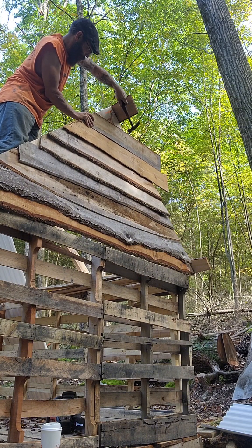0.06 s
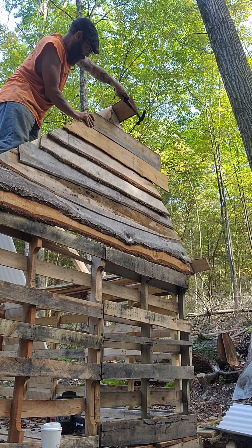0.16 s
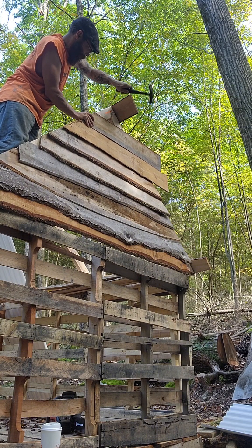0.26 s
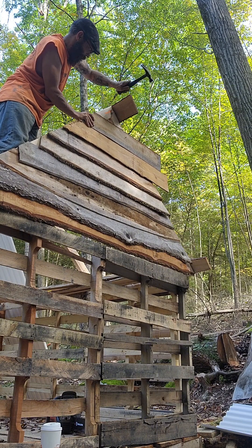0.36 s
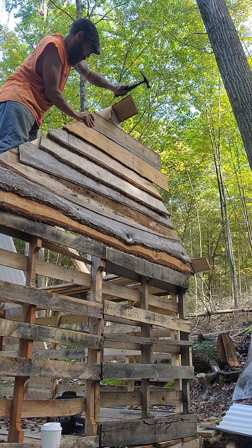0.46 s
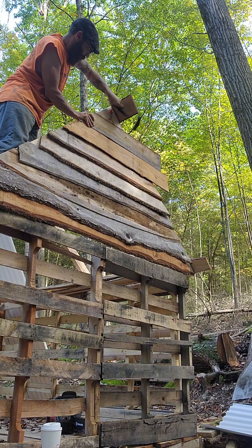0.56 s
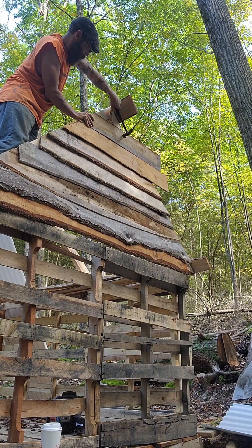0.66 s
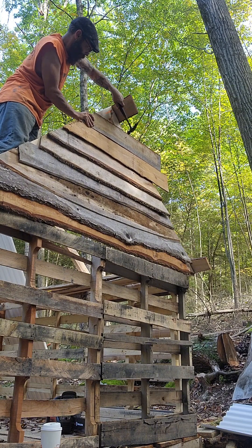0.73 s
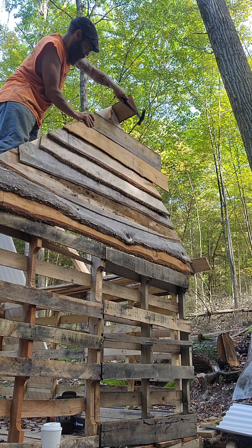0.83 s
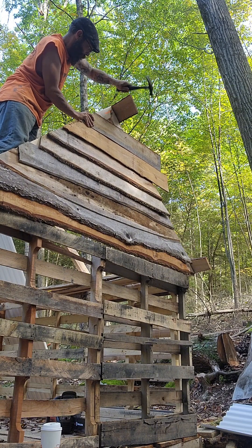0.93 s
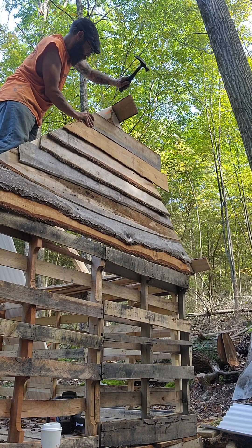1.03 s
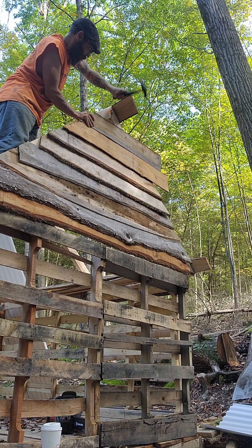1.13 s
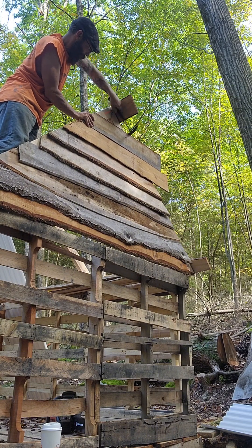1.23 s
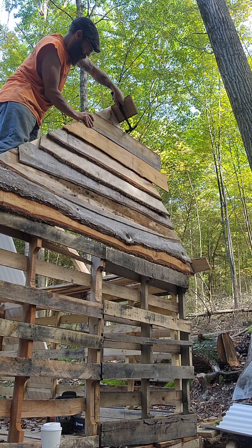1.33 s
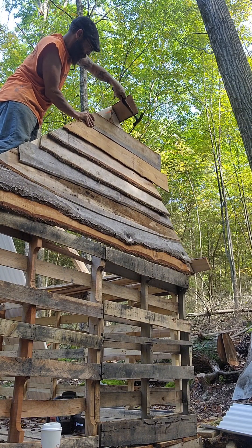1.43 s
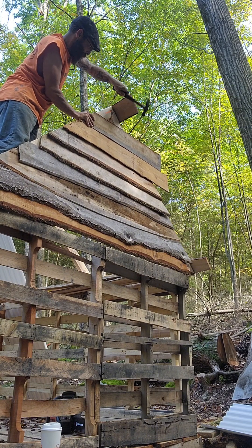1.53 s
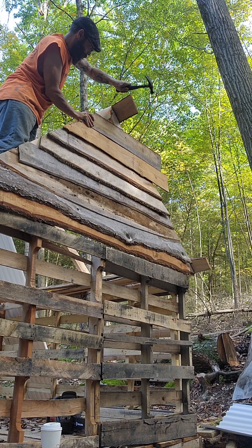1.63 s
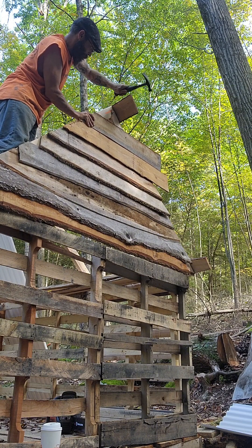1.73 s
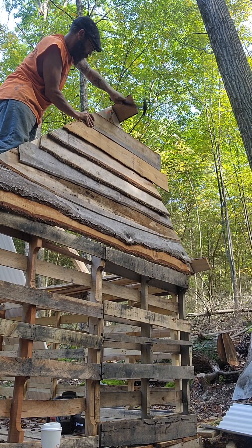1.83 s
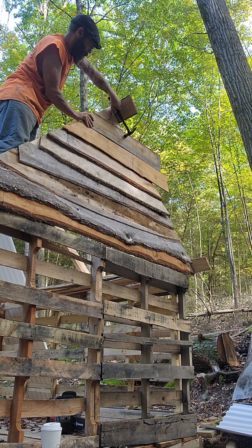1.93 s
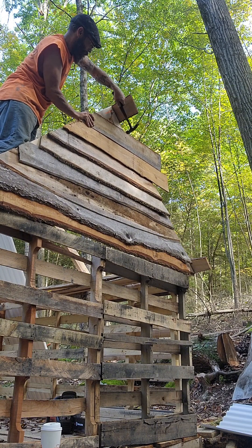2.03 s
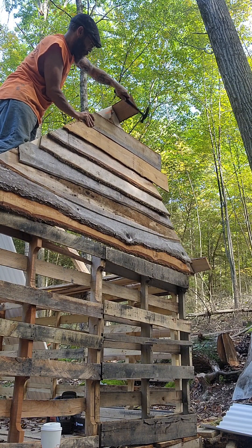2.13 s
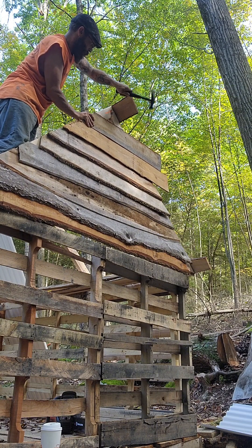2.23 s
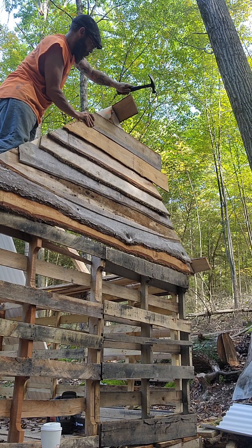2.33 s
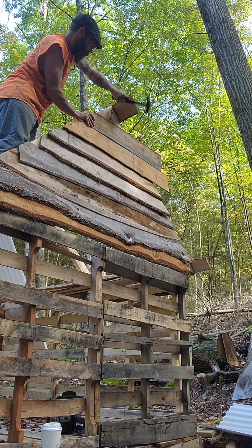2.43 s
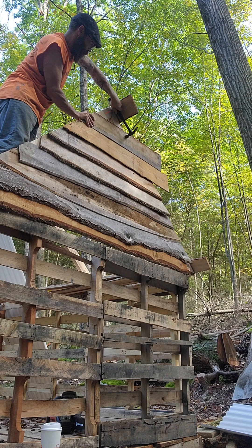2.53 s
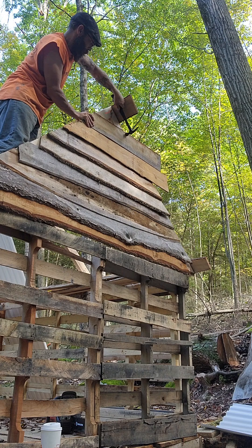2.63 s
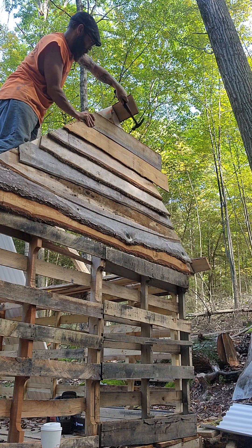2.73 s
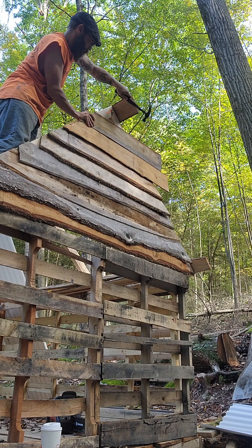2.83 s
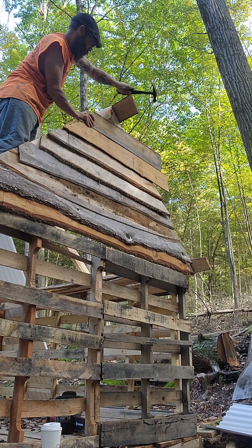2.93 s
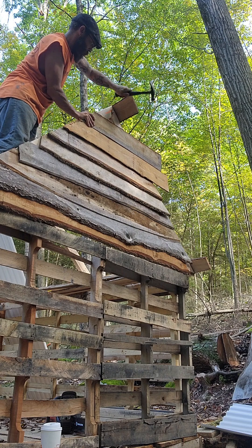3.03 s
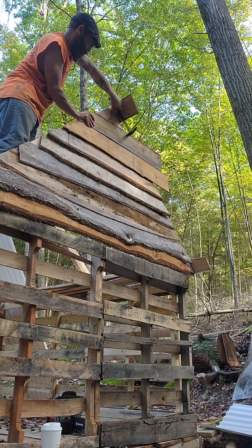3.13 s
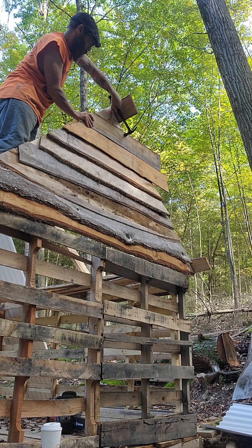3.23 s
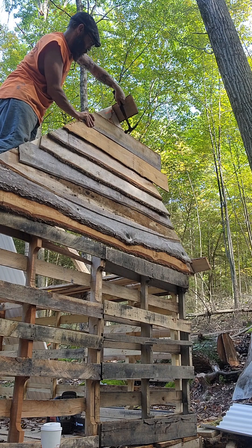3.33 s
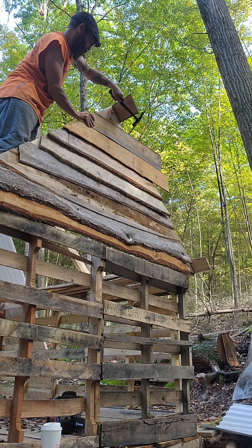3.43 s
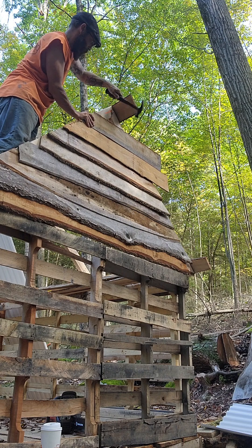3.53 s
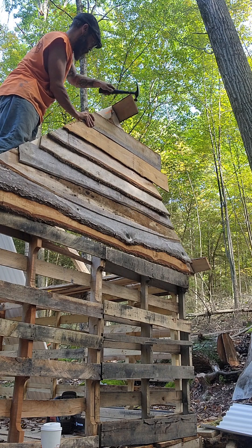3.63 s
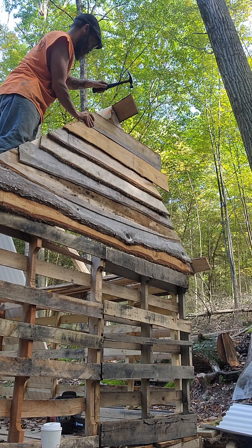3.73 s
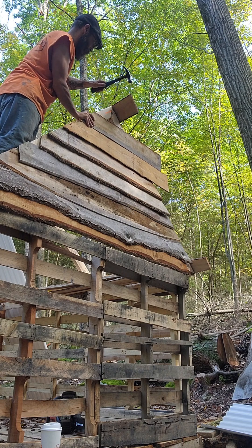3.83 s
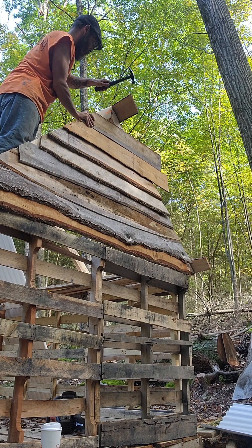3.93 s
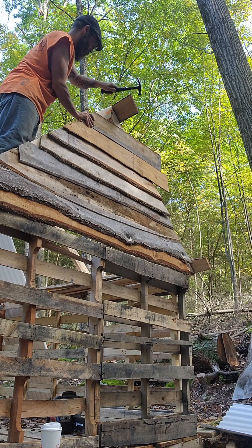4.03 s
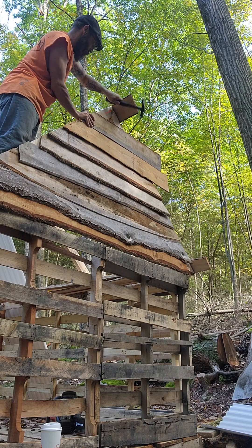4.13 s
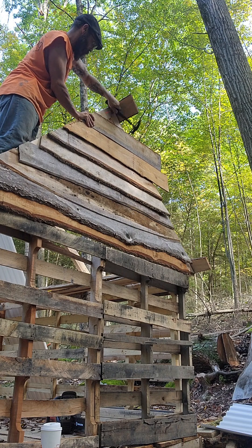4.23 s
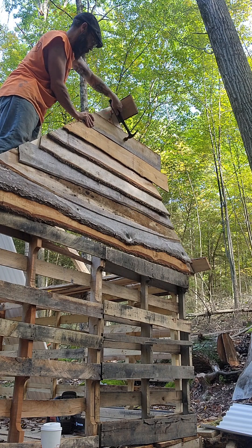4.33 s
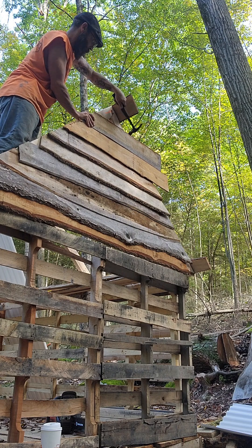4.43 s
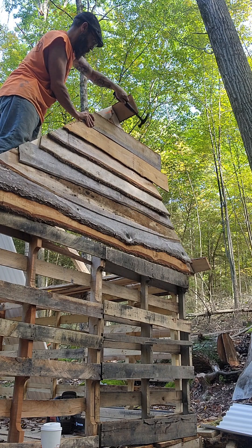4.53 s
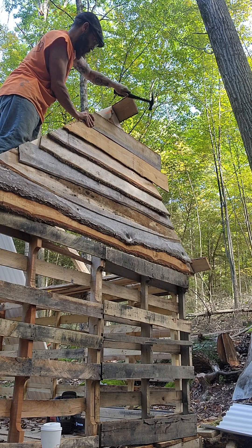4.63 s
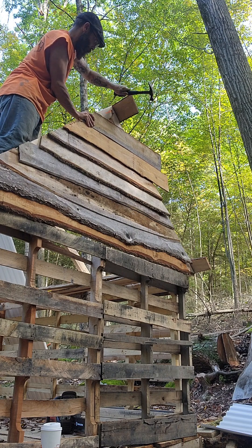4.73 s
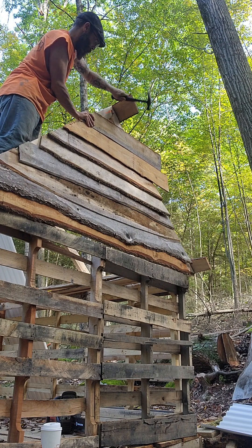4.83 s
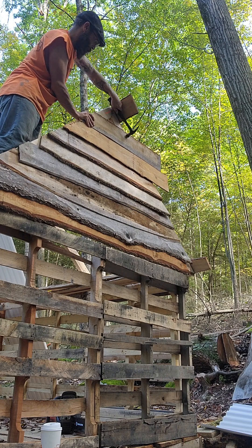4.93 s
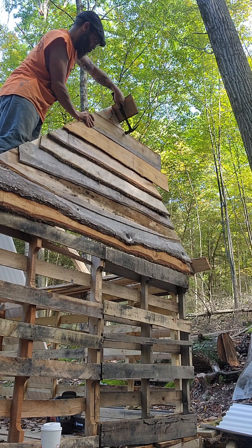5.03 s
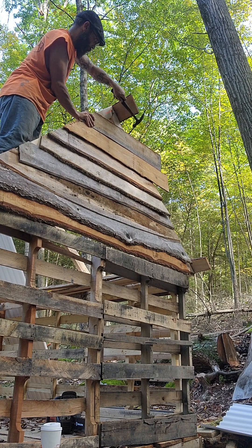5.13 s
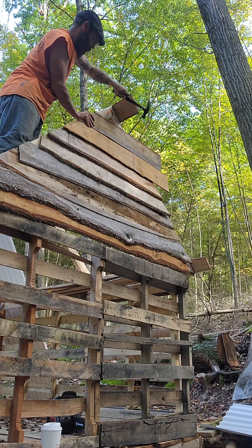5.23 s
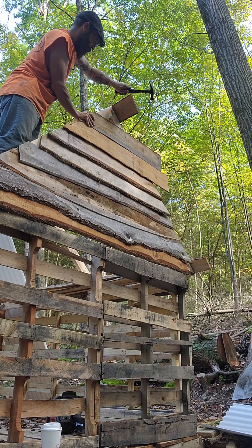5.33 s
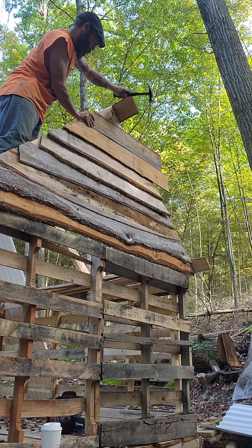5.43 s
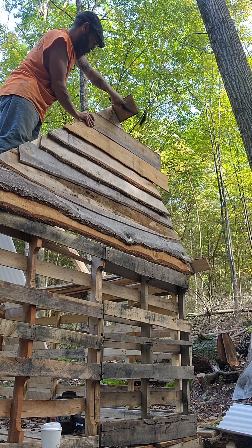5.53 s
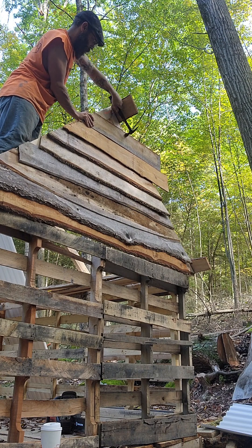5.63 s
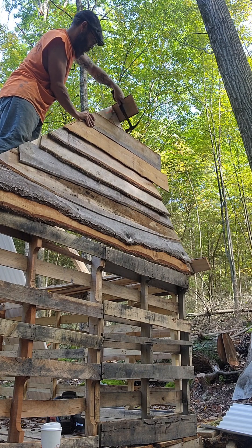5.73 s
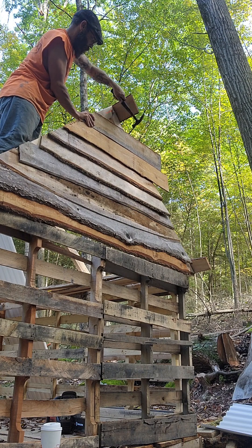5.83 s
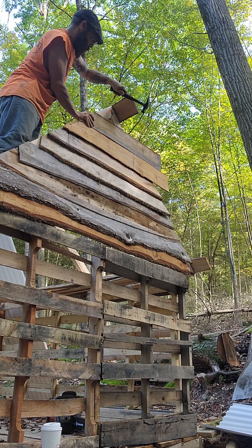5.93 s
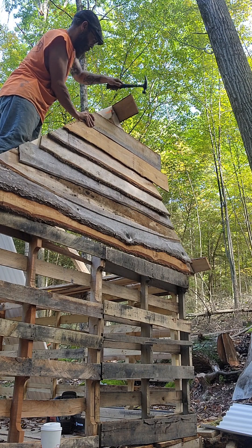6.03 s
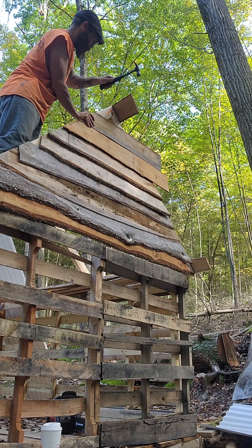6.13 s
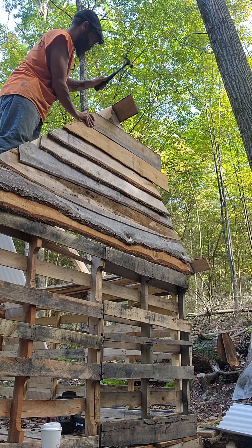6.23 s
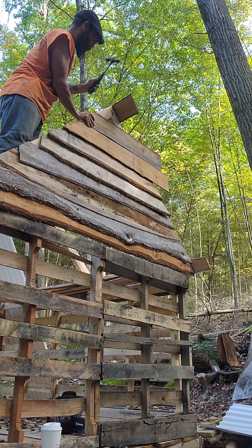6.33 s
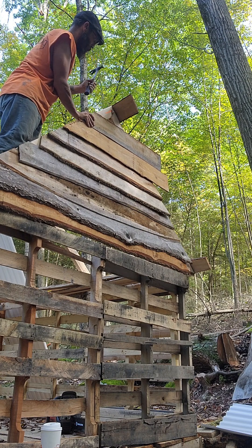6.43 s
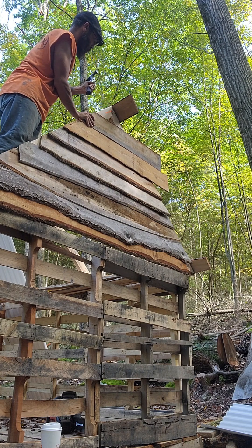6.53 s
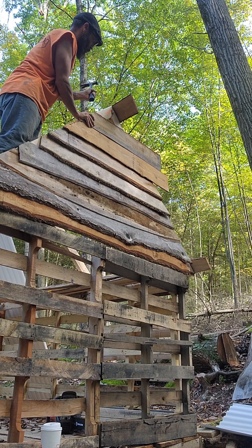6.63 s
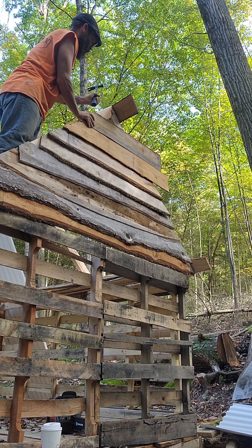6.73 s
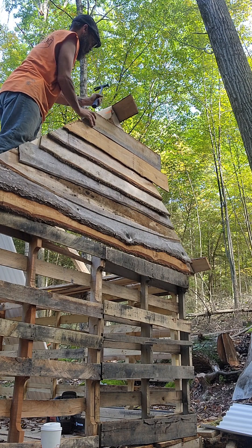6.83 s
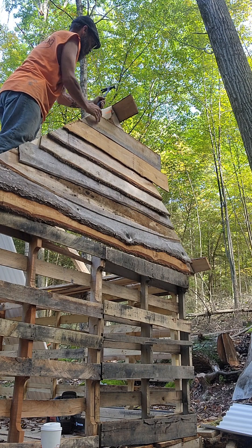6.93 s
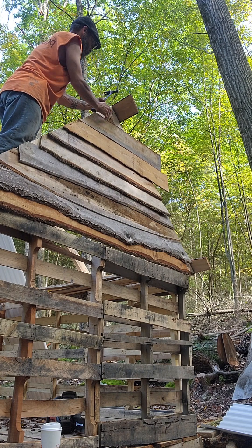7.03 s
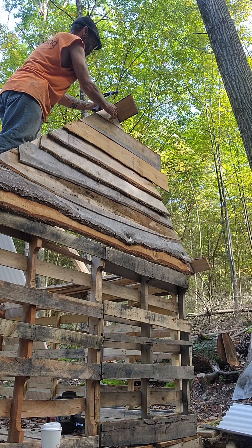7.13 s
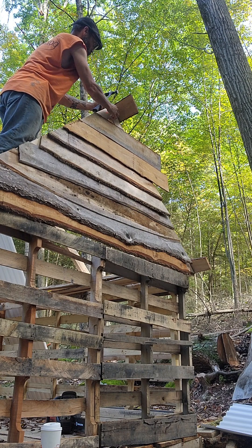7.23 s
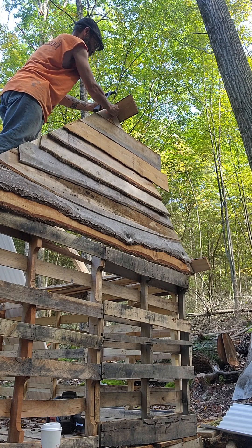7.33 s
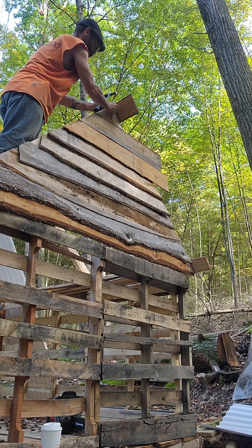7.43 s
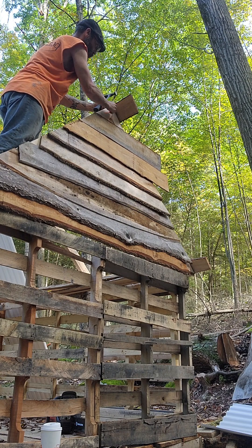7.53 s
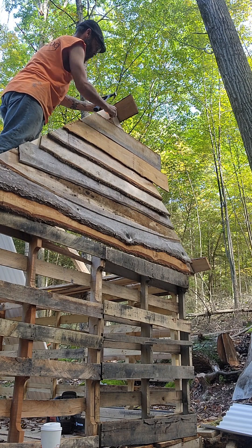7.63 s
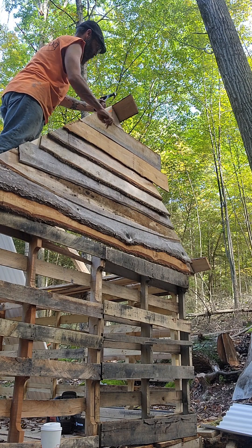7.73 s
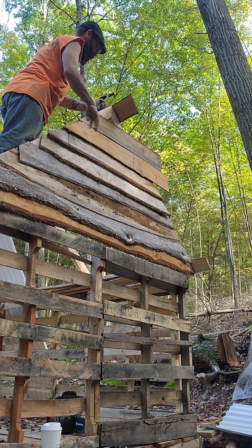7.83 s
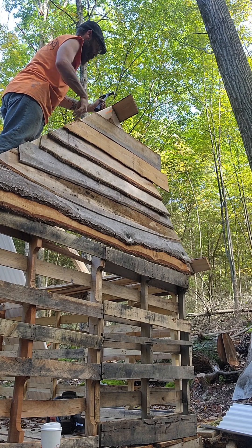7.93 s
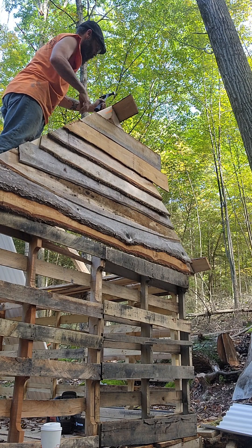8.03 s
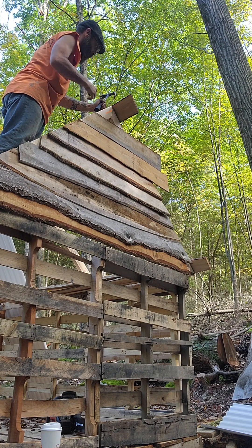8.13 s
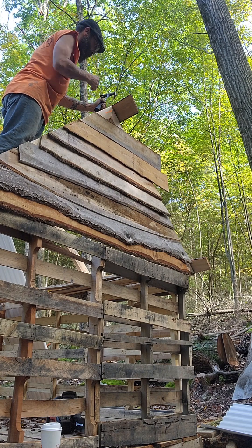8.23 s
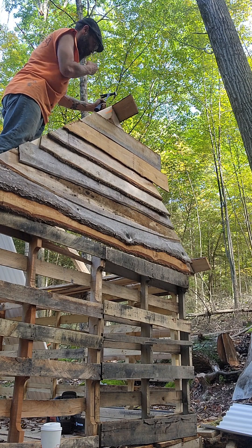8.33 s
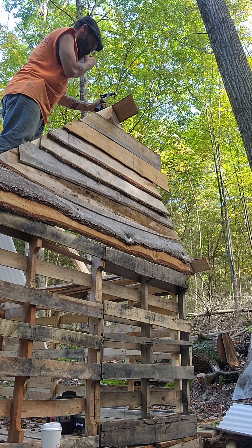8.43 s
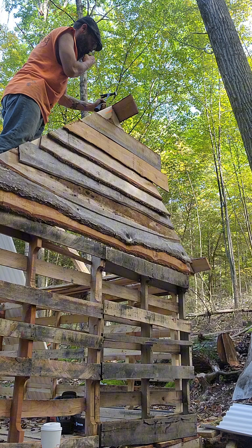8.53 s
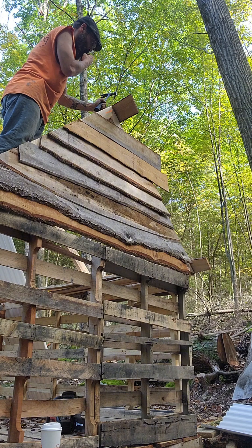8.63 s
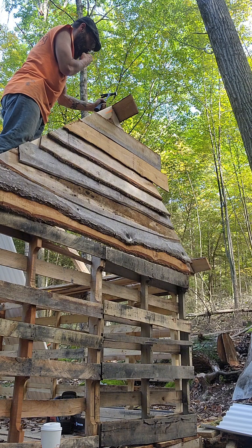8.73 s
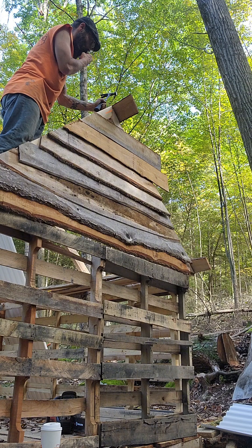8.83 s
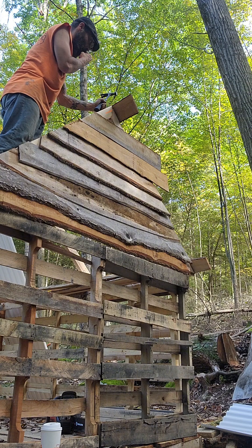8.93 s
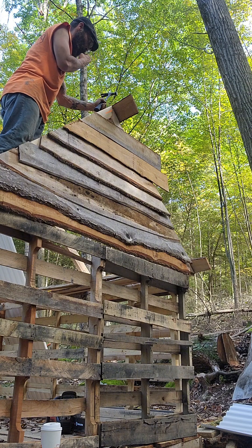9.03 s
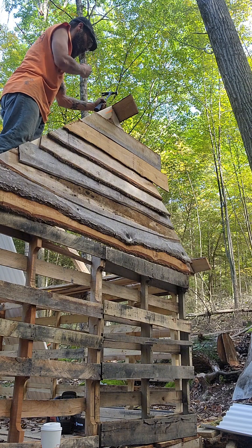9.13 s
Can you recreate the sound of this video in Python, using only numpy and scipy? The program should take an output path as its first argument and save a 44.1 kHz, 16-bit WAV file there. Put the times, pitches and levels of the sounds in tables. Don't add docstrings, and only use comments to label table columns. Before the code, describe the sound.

Outdoors in leafy woods, sharp hammer strikes ring on a nail and thump loose boards, with a pause, then small dry ticks and scrapes.

```python
import sys
import numpy as np
from scipy import signal
from scipy.fft import rfft, irfft, next_fast_len
from scipy.io import wavfile
from scipy.ndimage import uniform_filter1d, map_coordinates

SR = 44100
rng = np.random.default_rng(int(sys.argv[2]) if len(sys.argv) > 2 else 0)


def unload_audio(sound):
    columns = np.transpose(np.atleast_2d(sound))
    steps = np.round(np.clip(columns, -1, 1) * 32767)
    wavfile.write(sys.argv[1], SR, steps.astype(np.int16))


def decibels_to_gain(level_db):
    exponent = np.asarray(level_db, float) / 20
    return 10 ** exponent


N = 404382


def unit(x):
    return x / np.sqrt(np.mean(x ** 2) + 1e-20)


def along(points, hz):
    f, v = np.transpose(points)
    return np.interp(np.log(hz + 1), np.log(f + 1), v)


def wobble(rate_hz):
    return map_coordinates(rng.standard_normal(int(N * rate_hz / SR) + 4), [np.arange(N) * rate_hz / SR])


def filtered(x, response):
    m = next_fast_len(x.shape[-1] + 4096)
    return irfft(rfft(x, m) * response(np.fft.rfftfreq(m, 1 / SR)), m)[..., :x.shape[-1]]


def noise(size, spectrum, alike):
    def mid_side(hz):
        turn = np.arccos(np.clip(along(alike, hz), -1, 1)) / 2
        return decibels_to_gain(along(spectrum, hz)) * [np.cos(turn), np.sin(turn)]
    mid, side = filtered(rng.standard_normal((2, size)), mid_side)
    return unit(np.array([mid + side, mid - side]))


def shaped(x, gain_db):
    hz, t, z = signal.stft(x, SR, nperseg=256)
    return signal.istft(z * decibels_to_gain(gain_db(hz[:, None], t)), SR, nperseg=256)[1][..., :x.shape[-1]]


def patchy(x, patchy_db):
    field = rng.standard_normal((129, x.shape[-1] // 128 + 4))
    field = uniform_filter1d(field, size=3, axis=0)
    field = unit(uniform_filter1d(field, size=16, axis=1))
    return shaped(x, lambda hz, t: patchy_db * field[:, :len(t)])


def ring(modes, t, attack, spread, longest):
    draw = rng.standard_normal((len(modes), 2)) * [.35, 1]
    side = np.array([[1], [-1]])
    total = 0
    for (hz, db, t60), (start, turn) in zip(modes, draw):
        t60 = min(t60, longest * (500 / hz) ** 0.21)
        phase = start + spread * turn * side * hz / (hz + 500)
        total = total + decibels_to_gain(db - 60 * t / t60) * np.sin(2 * np.pi * hz * t + phase)
    return total * (1 - np.exp(-t / attack))


def ports(x, lean, lead_s):
    def response(hz):
        half = decibels_to_gain(along(lean, hz) / 2) * np.exp(1j * np.pi * hz * lead_s)
        return np.array([half, 1 / half])
    return filtered(x, response)


def add(track, s, x):
    i = round(s * SR)
    track[:, i:i + x.shape[-1]] += x[..., :N - i]


# frequency in Hz, likeness -1 to 1.
DIFFUSE_ALIKE = [(60, 0.99), (180, 0.93), (550, 0.76), (1650, 0.094), (4970, -0.09), (15000, -0.02)]
# frequency in Hz, level in dB per Hz.
RUMBLE_COLOUR = [(12, -35), (20, -6.5), (48, 0), (61, 0.5), (108, -19), (130, -15), (170, -42), (290, -120)]
# frequency in Hz, level in dB per Hz.
DRONE_COLOUR = [(60, -120), (110, -40.5), (148, -7.5), (165, 1), (184, -5.5), (240, -46), (400, -120)]
# centre in seconds, level in dB, half length in seconds.
DRONE_SWELLS = [
    (0, -53.5, 0.308),
    (.7, -64, 0.25),
    (1.3, -57, 0.304),
    (1.9, -54, 0.291),
    (2.8, -62.5, 0.363),
    (4.2, -62, 0.27),
    (5.3, -68.5, .5),
    (7.1, -76, 0.47),
    (9.1, -73.5, 0.37),
]


def traffic():
    t = np.arange(N) / SR
    rumble_db = -64.5 + 0.63 * wobble(0.73) + 1.0 * wobble(4.4)
    rumble = decibels_to_gain(rumble_db) * noise(N, RUMBLE_COLOUR, DIFFUSE_ALIKE)
    passing = decibels_to_gain(-81) + sum(decibels_to_gain(db) * np.exp(-((t - s) / half_s) ** 2) for s, db, half_s in DRONE_SWELLS)
    return rumble + passing * decibels_to_gain(1.1 * wobble(9.7)) * noise(N, DRONE_COLOUR, DIFFUSE_ALIKE)


# frequency in Hz, level in dB per Hz.
LEAF_COLOUR = [(59, -39.5), (100, -10), (152, -8), (234, -17.5), (280, -15), (577, -16.5), (716, -14.5),
               (1170, -19.5), (1320, -15), (1530, -22.5), (1930, -21), (2360, -26), (4690, -27.5),
               (7500, -51), (9750, -74.5), (16500, -120)]
# time in seconds, level in dB.
BREEZE_LEVEL = [
    (0, -63.5),
    (2, -64),
    (4.2, -65.5),
    (6.4, -65.5),
    (7, -68.5),
    (7.8, -65),
    (9.17, -63.5),
]


def leaves():
    s, db = np.transpose(BREEZE_LEVEL)
    leaves_db = np.interp(np.arange(N) / SR, s, db, -120, -120) + .6 * wobble(7)
    return decibels_to_gain(leaves_db) * patchy(noise(N, LEAF_COLOUR, DIFFUSE_ALIKE), patchy_db=1.95)


MIDDLE_STEEL_DB, MIDDLE_AIR_DB, MIDDLE_KNOCK_DB = -15, -38, -18
MIDDLE_TILT_DB = 1.91


def brightness(steel_db, air_db):
    return MIDDLE_TILT_DB + .1 * (steel_db - MIDDLE_STEEL_DB) + 0.1 * (air_db - MIDDLE_AIR_DB)


# frequency in Hz, likeness -1 to 1.
SHED_ALIKE = [(100, 0.98), (300, 1), (700, 0.71), (1500, 1), (4000, 0.67), (12000, 0.35)]
# frequency in Hz, level in dB per Hz.
CRACK_COLOUR = [(590, -29.5), (1000, 1), (1690, -6.5), (3040, -0.5), (3790, 1.5), (4270, 4.5), (6100, -14),
                (7600, -36), (9880, -52.5), (16700, -120)]


def steel_contact(t):
    return (1 - np.exp(-t / .0002)) * np.exp(-(t / .0026) ** 2)


def crack(t, db):
    return decibels_to_gain(db) * steel_contact(t) * noise(len(t), CRACK_COLOUR, SHED_ALIKE)


# pitch over crack pitch, level in dB.
HEAD_MODES = [
    (.34, -8),
    (.67, -4),
    (1, -1),
]


def head_clang(t, steel_db, crack_hz):
    harder_db = steel_db - MIDDLE_STEEL_DB
    clang = [(r * crack_hz, db + harder_db * (1 if r == 1 else 0.32), .019) for r, db in HEAD_MODES]
    return decibels_to_gain(MIDDLE_STEEL_DB + 8.5) * ring(clang, t, attack=0.00082, spread=0.037, longest=.2)


# frequency in Hz, level in dB, t60 in seconds.
NAIL_MODES = [
    (5090, 0, .17),
    (6870, -14, .06),
    (2700, -6, .07),
]


def nail_ring(t, nail_db):
    modes = sum(decibels_to_gain(db - 60 * t / t60) * np.sin(2 * np.pi * hz * t) for hz, db, t60 in NAIL_MODES)
    return decibels_to_gain(nail_db - 2.5 + np.array([[-3.5], [1.5]])) * modes


# frequency in Hz, level in dB per Hz.
AIR_COLOUR = [(5500, -28.5), (7200, -6.5), (8000, -16), (9000, 0), (10500, -1.5), (13300, -0.5),
              (14800, -4), (16300, -24)]


def air_burst(t, air_db):
    envelope = .7 * steel_contact(t) + decibels_to_gain(-12 - 60 * t / .12) + decibels_to_gain(-29 - 60 * t / .33)
    return decibels_to_gain(air_db + 4.0) * envelope * noise(len(t), AIR_COLOUR, SHED_ALIKE)


def wood_push(late, thump_db):
    hz = 270
    push_db = -5 + .55 * (thump_db + 10.5)
    return decibels_to_gain(push_db - 60 * late * hz / 5.9) * np.sin(2 * np.pi * hz * late) * (1 - np.exp(-late / .0006))


# frequency in Hz, level in dB, t60 in seconds.
BEAM_MODES = [
    (166.5, -8.5, 0.21),
    (220.2, -0.5, .22),
]


def beam_thump(late, thump_db, favoured_hz, knock_db):
    thump = decibels_to_gain(thump_db - 6.0) * ring(BEAM_MODES, late, attack=0.012, spread=.05, longest=.2)
    return thump + ring([(favoured_hz, knock_db + 0.5, .038)], late, attack=.0006, spread=.3, longest=.2)


# frequency in Hz, level in dB, t60 in seconds.
SLAB_MODES = [(262.5, -8, .2), (351.4, -4.5, .25), (434.54, -12, .2), (501.5, -5, .2), (605.2, -7, .25),
              (679.3, -8, .2), (761, -10, .15), (851.2, -11, .15), (960, -12.5, 0.15), (1204.8, -11.5, .18),
              (1336, -7, .18), (1413.4, -10.5, .16), (1635, -16.5, .15), (1860, -10, .14)]
# frequency in Hz, level in dB, t60 in seconds.
SLAT_MODES = [
    (2165, -19.5, .13),
    (2726, -21, 0.14),
    (3110, -19.5, 0.082),
    (3478, -20.5, .11),
    (4056, -19, 0.12),
    (4200, -17, 0.04),
    (5010, -21.5, 0.11),
]


def woken(favoured_hz, tilt):
    hz, db, t60 = np.transpose(SLAB_MODES + SLAT_MODES)
    chance = rng.standard_normal((2, len(hz)))
    favour_db = 3 * np.exp(-(np.log2(hz / favoured_hz) / 0.1) ** 2)
    tilt_db = (tilt - MIDDLE_TILT_DB) * np.log2(hz / 700)
    return np.transpose([hz * (1 + .01 * chance[0]), db + favour_db + tilt_db + 2.5 * chance[1], t60])


def boards(late, boards_db, favoured_hz, tilt, free):
    first = 1 + 0.39 * np.exp(-late / .006)
    modes = woken(favoured_hz, tilt)
    return decibels_to_gain(boards_db - 4) * first * ring(modes, late, attack=.0008, spread=.8, longest=.2 * free)


# frequency in Hz, level in dB per Hz.
CLATTER_COLOUR = [(88, -36), (150, 5.5), (558, -3), (929, -9), (1250, -5), (2450, -15.5), (2750, -12.5),
                  (4960, -21.5), (5940, -27.5), (7000, -27.5), (7600, -45.5), (9880, -71.5), (16700, -120)]
# frequency in Hz, t60 in seconds.
CLATTER_DECAY = [(200, 0.24), (700, 0.22), (1500, 0.17), (3000, 0.16), (7000, 0.11), (14000, 0.12)]


def clatter(late, boards_db, tilt, free):
    def dying(hz, u):
        return tilt * np.log2(hz / 700 + 0.14) - 60 * u / along(CLATTER_DECAY, hz) / free
    rattling = shaped(noise(len(late), CLATTER_COLOUR, SHED_ALIKE), dying)
    return decibels_to_gain(boards_db - 2.77) * (1 - np.exp(-late / 0.0007)) * rattling


# frequency in Hz, level in dB, t60 in seconds.
FRAME_MODES = [
    (55.6, -5, 0.38),
    (82, -2.5, 0.33),
    (89.85, -2, 0.43),
    (117.5, -1.5, 0.27),
]


def frame_sway(t, s):
    return decibels_to_gain(-21.5 - 1.5 * s - 4.5) * ring(FRAME_MODES, t, attack=0.044, spread=.05, longest=0.44)


# start in seconds, steel in dB, air in dB, nail ring in dB, crack pitch in Hz.
STEEL_BLOWS = [
    (0.0734, -11, -36, -31, 4114),
    (0.7421, -18.5, -35.5, -20.5, 4013),
    (1.3898, -12, -37.5, -21.5, 4020),
    (2.032, -11, -31.5, -32, 4100),
    (2.6769, -12.5, -35, -31, 4150),
    (3.3139, -16, -40, -33, 4200),
    (4.4151, -19.5, -51, -37, 4061),
    (5.0763, -11.5, -43, -45.5, 3820),
    (5.7177, -12.5, -36.5, -39, 3950),
]
# boards in dB, thump in dB, favoured pitch in Hz,
# first knock in dB, echo in dB.
WOOD_ANSWERS = [
    (-14, -8.5, 550, -20.5, -43.5),
    (-13.5, -9.5, 1600, -21, -44.5),
    (-13.5, -13, 690, -19.5, -42),
    (-13, -8.5, 650, -14, -44.5),
    (-15, -11.5, 365, -23.5, -43),
    (-12.5, -21, 600, -13.5, -37),
    (-13.5, -18, 560, -7.5, -44),
    (-11.5, -23.5, 520, -5, -40),
    (-15, -19, 510, -15, -42.5),
]
# start in seconds, level in dB.
HEAD_BOUNCES = [
    (.094, -24),
    (.794, -41),
    (2.039, -25),
    (3.335, -24.5),
]
# frequency in Hz, left over right in dB.
SHED_LEAN = [(60, 0), (200, -0.2), (700, -0.4), (1290, -0.53), (2380, 3.5), (4400, -2), (8120, 13.5),
             (15000, 8)]


def hammer():
    out, t = np.zeros((2, N)), np.arange(SR * 2 // 5) / SR
    late = np.maximum(t - .0026, 0)
    for steel, wood in zip(STEEL_BLOWS, WOOD_ANSWERS):
        s, steel_db, air_db, nail_db, crack_hz = steel
        boards_db, thump_db, favoured_hz, knock_db, _ = wood
        tilt = brightness(steel_db, air_db)
        free = 1 - .015 * (knock_db - MIDDLE_KNOCK_DB)
        knots = rng.standard_normal((2, 130))
        slow, fast = decibels_to_gain(2.9 * map_coordinates(knots, [[0 * t, 0 * t + 1], [t * 90, t * 300]]))
        blow = crack(t, steel_db + 3.4) + head_clang(t, steel_db, crack_hz) + air_burst(t, air_db)
        blow += wood_push(late, thump_db)
        blow += slow * (nail_ring(t, nail_db) + beam_thump(late, thump_db, favoured_hz, knock_db))
        blow += slow * boards(late, boards_db, favoured_hz, tilt, free)
        blow += fast * clatter(late, boards_db, tilt, free) + frame_sway(t, s)
        add(out, s, blow)
    for s, db in HEAD_BOUNCES:
        add(out, s, crack(t, db + 5.0))
    low_cut = signal.butter(3, 56, "high", fs=SR, output="sos")
    return ports(signal.sosfilt(low_cut, out), SHED_LEAN, lead_s=0.00015)


# frequency in Hz, level in dB per Hz.
ECHO_COLOUR = [(88, -28.5), (150, -7), (398, -8), (484, -8.5), (566, -8), (1140, -13), (1260, -11),
               (1940, -11.5), (2450, -14.5), (5150, -15), (6910, -28), (7920, -58.5), (13200, -45),
               (16000, -70)]
# frequency in Hz, t60 in seconds.
ECHO_DECAY = [(200, 2.8), (1000, 2.1), (3000, 1.486), (5000, 1.2), (7000, 1.1), (12000, 0.37)]
# centre in Hz, width in Hz, level in dB.
HOLLOW_BANDS = [
    (1300, 14, -15.5),
    (1930, 6.1, -17),
    (2080, 9, -19.5),
]


def shed_lift(hz):
    peaks = [1 / (1 + ((hz - f) / (10 + .007 * f)) ** 2) for f, *_ in SLAB_MODES + SLAT_MODES]
    return 1 + 0.29 * sum(peaks)


def hollow(hz):
    return sum(decibels_to_gain(db) / np.sqrt(w / 15) / (1 + ((hz - f) / w) ** 2) for f, w, db in HOLLOW_BANDS)


def forest():
    out, t = np.zeros((2, N)), np.arange(SR * 7 // 5) / SR
    swell = 1 - 0.77 * np.exp(-(t / 0.2) ** 2)
    fade = np.cos(np.pi / 2 * t / t[-1])
    for (s, steel_db, air_db, *_), (*_, echo_db) in zip(STEEL_BLOWS, WOOD_ANSWERS):
        tilt = brightness(steel_db, air_db)
        longer = 0.59 + 0.0536 * tilt

        def dying(hz, u):
            return tilt * np.log2(hz / 700 + 0.13) - 60 * u / along(ECHO_DECAY, hz) / longer
        echo = shaped(unit(filtered(noise(len(t), ECHO_COLOUR, DIFFUSE_ALIKE), shed_lift)), dying)
        linger = 30 * decibels_to_gain(-60 * t / (4.8 * longer ** 2))
        linger = linger * filtered(rng.standard_normal((2, len(t))), hollow)
        linger = linger * decibels_to_gain(3 * wobble(5.2)[:len(t)]) * fade
        add(out, s + .004, decibels_to_gain(echo_db) * swell * (echo + linger))
    return patchy(out, patchy_db=2.0) * decibels_to_gain(0.44 * wobble(25))


# end in seconds, level in dB, swell in seconds.
BARK_STROKES = [
    (7.53, -66, .15),
    (7.65, -75, .1),
    (7.89, -74, 0.13),
    (9.004, -69.5, .035),
]


def bark_scrape():
    colour = [(2500, -31), (4800, 1.0), (6800, -6.5), (8200, -21.0), (12500, -17.5), (16500, -39.0)]
    bark = noise(N, colour, [(1000, 0.35)])
    stroke = 0
    for end_s, db, swell_s in BARK_STROKES:
        u = np.arange(N) / SR - end_s
        after = np.maximum(decibels_to_gain(-60 * np.abs(u) / 0.032), decibels_to_gain(-10) * np.exp(-(u / 0.13) ** 2))
        stroke = stroke + decibels_to_gain(db) * np.where(u < 0, decibels_to_gain(-20 * np.abs(u) / swell_s), after)
    return decibels_to_gain([[0.5], [-4]]) * stroke * decibels_to_gain(3 * wobble(150)) * bark


# start in seconds, peak in dB, centre in Hz, low body in dB.
FINGER_TICKS = [(7.4031, -57.5, 4900, -7), (7.4215, -53, 6863, -20), (7.4545, -51.5, 4867, -8),
                (7.4844, -58, 4430, -6.5), (7.5208, -50, 5130, -19), (7.5444, -62.5, 4520, -3),
                (7.5674, -60, 5230, -12.5), (7.64, -45, 4917, -2.08), (7.6464, -47, 4570, -6.5),
                (7.8396, -56.5, 4460, -10), (7.8914, -56, 4940, -12), (8.997, -55.5, 4970, -12),
                (9.0344, -64.5, 4450, -1.5)]


def finger_ticks():
    out, t = np.zeros((2, N)), np.arange(SR // 10) / SR
    left_db = 14 * np.array([[.5], [-.5]])
    envelope = decibels_to_gain(0.5 - 60 * t / 0.0416) + 0.97 * decibels_to_gain(-60 * t / 0.00234)
    for s, db, hz, body_db in FINGER_TICKS:
        colour = [(300, body_db - 4), (1200, body_db), (hz / 1.1, max(body_db, -14)), (hz, 0),
                  (hz * 1.4, -14), (8200, -26), (12500, -20), (16500, -40)]
        add(out, s, decibels_to_gain(db - 13.5 + left_db) * envelope * noise(len(t), sorted(colour), [(1000, 0.45)]))
    return out


# frequency in Hz, left over right in dB.
FAR_LEAN = [(60, 0.5), (180, 1.0), (550, 1), (1650, 3), (4970, 5), (15000, 5.5)]


def scene():
    around = ports(traffic() + leaves() + forest(), FAR_LEAN, lead_s=.0001)
    return around + hammer() + bark_scrape() + finger_ticks()


def smear(x, size, error_db, scatter_db):
    hz, _, z = signal.stft(x.astype(np.float32), SR, nperseg=size)
    level = np.sqrt(np.abs(uniform_filter1d(np.abs(z) ** 2, size=8, axis=1)))
    level *= (hz / (hz + 250) * (1 + 1.3 / (1 + (hz / 1800) ** 2)))[:, None]
    chance = rng.standard_normal((3,) + z.shape, dtype=np.float32)
    error = level * decibels_to_gain(error_db + scatter_db * chance[0]) * (chance[1] + 1j * chance[2])
    return signal.istft(error, SR, nperseg=size)[1][:, :N]


def roll_off(x):
    return signal.sosfilt(signal.butter(12, 16470, fs=SR, output="sos"), x)


# frequency in Hz, level in dB per Hz.
HISS_COLOUR = [(4470, -36.5), (7600, -15), (11000, -2.5), (13700, 1), (15100, -0.5), (16300, -9)]


def record(dry):
    x = dry + decibels_to_gain(-98 + 3.0) * noise(N, HISS_COLOUR, [(1000, 0.0046)])
    x = x / (1 + np.abs(x / .98) ** 6) ** (1 / 6)
    long_error = smear(x, size=2048, error_db=-31, scatter_db=5)
    short_error = smear(x, size=1024, error_db=-19, scatter_db=4)
    return roll_off(x + long_error + short_error)


dry = scene()
out = record(dry)
unload_audio(out)
```